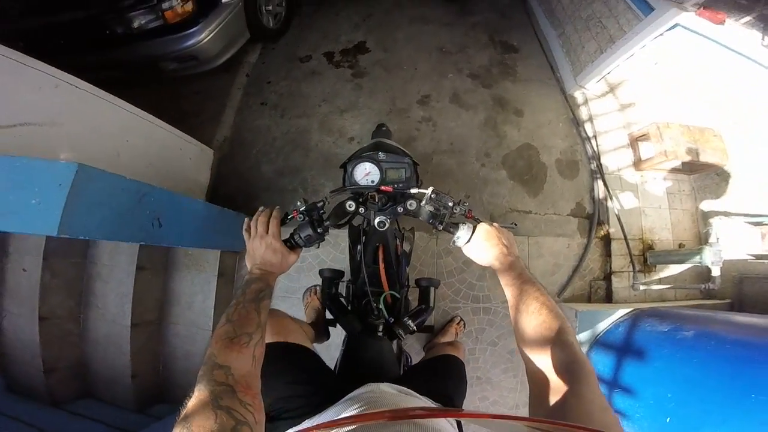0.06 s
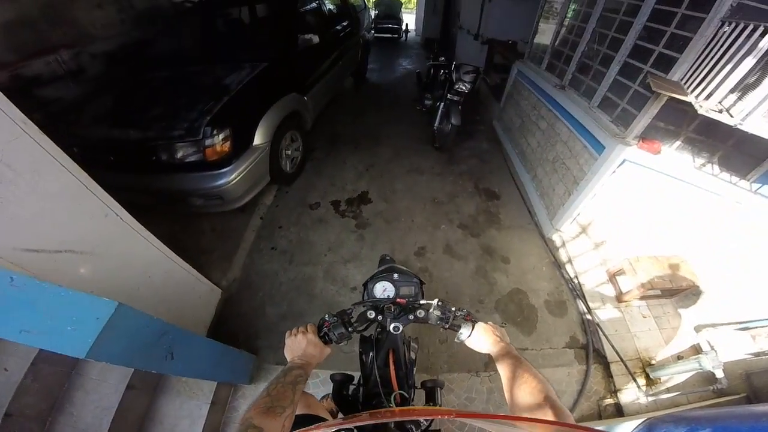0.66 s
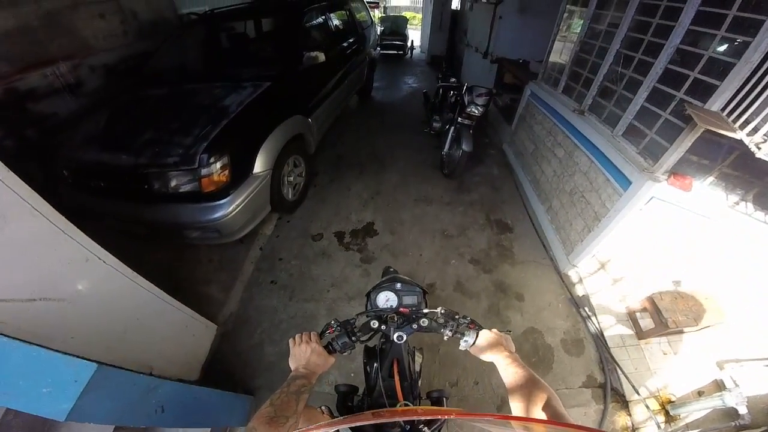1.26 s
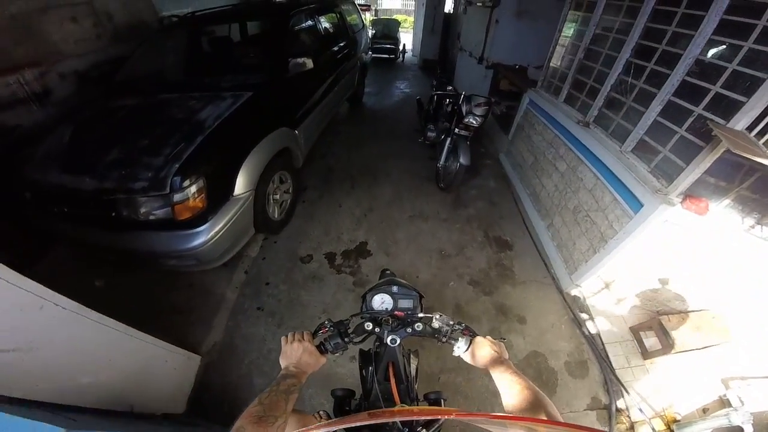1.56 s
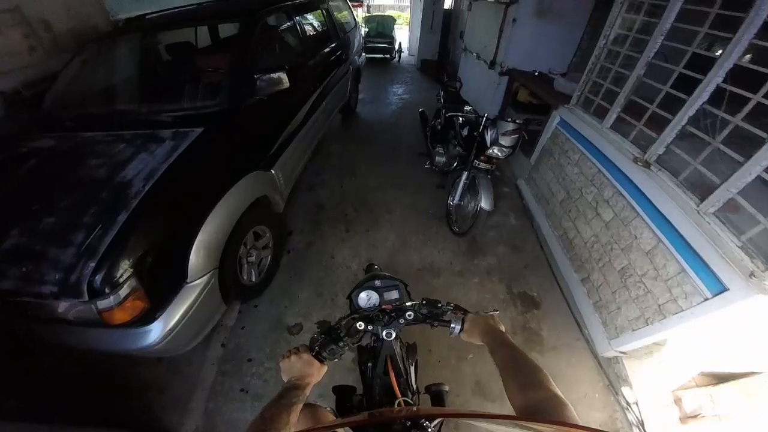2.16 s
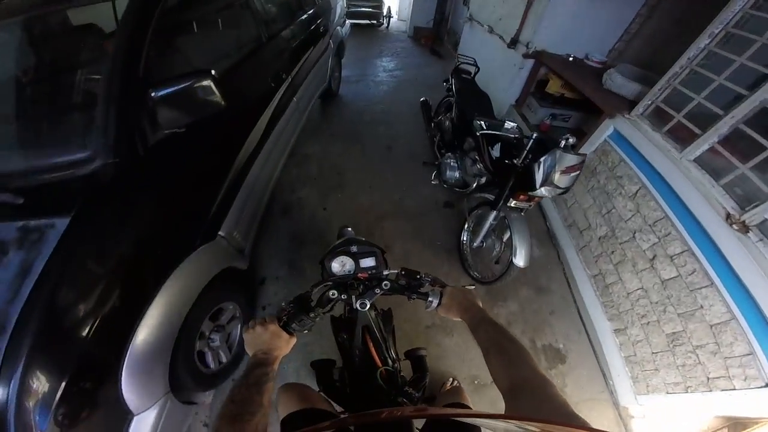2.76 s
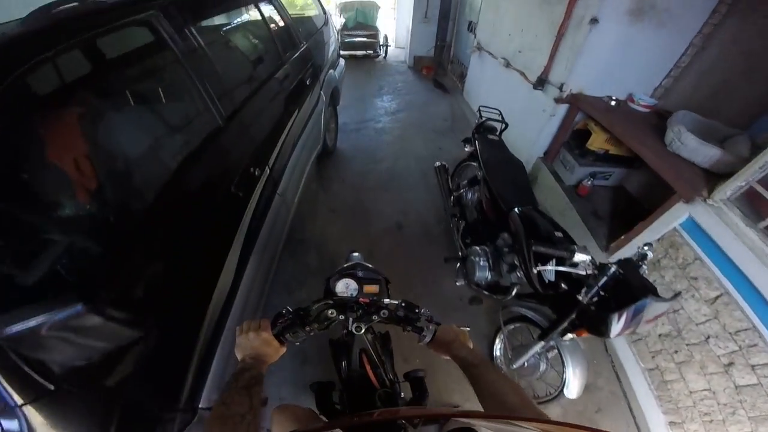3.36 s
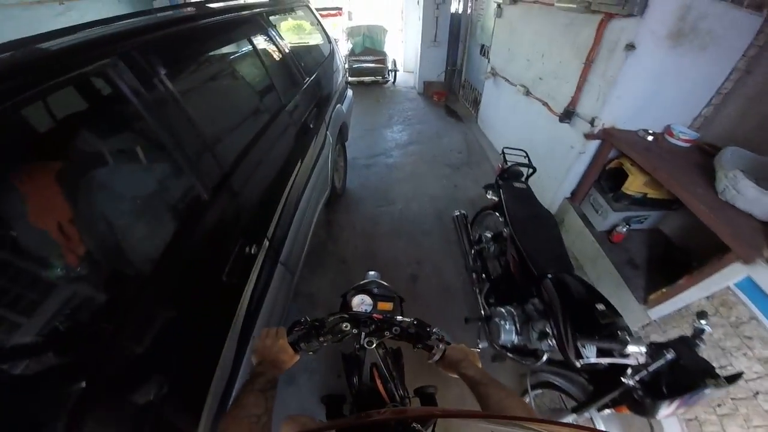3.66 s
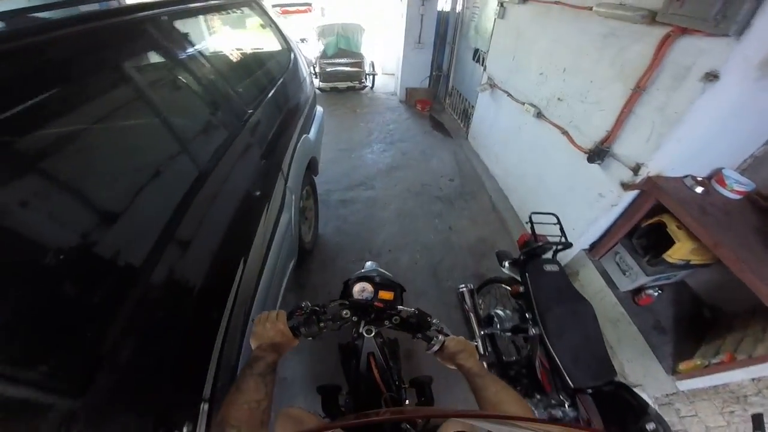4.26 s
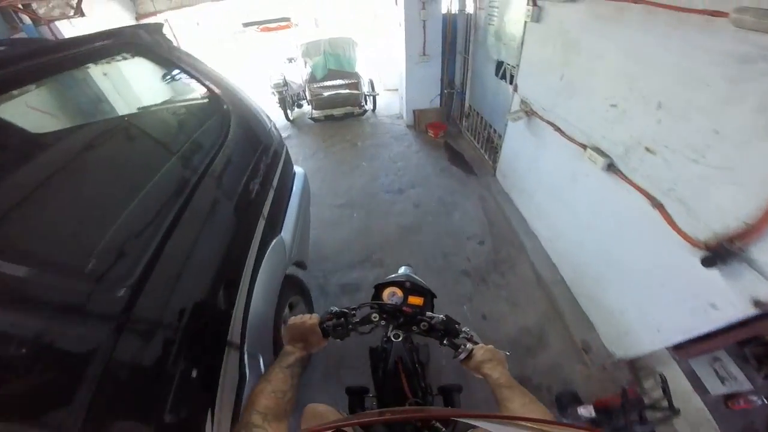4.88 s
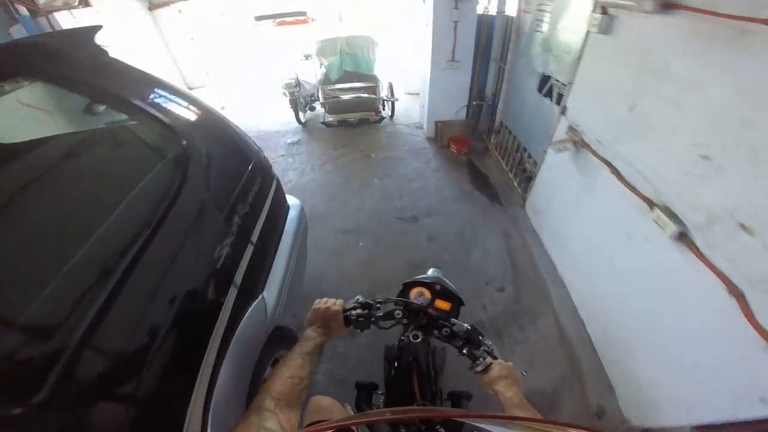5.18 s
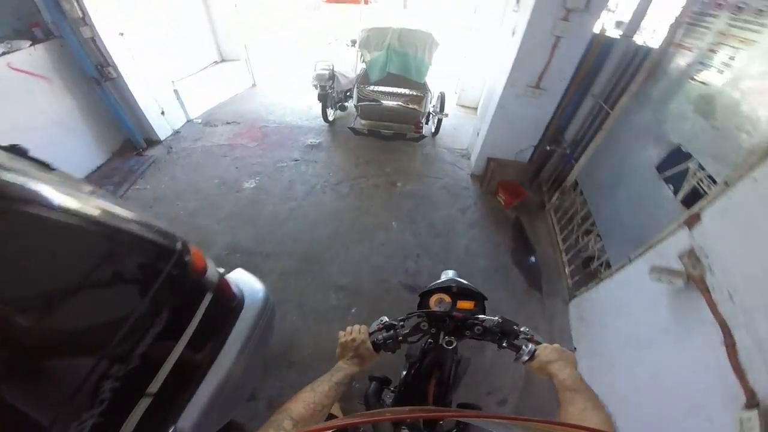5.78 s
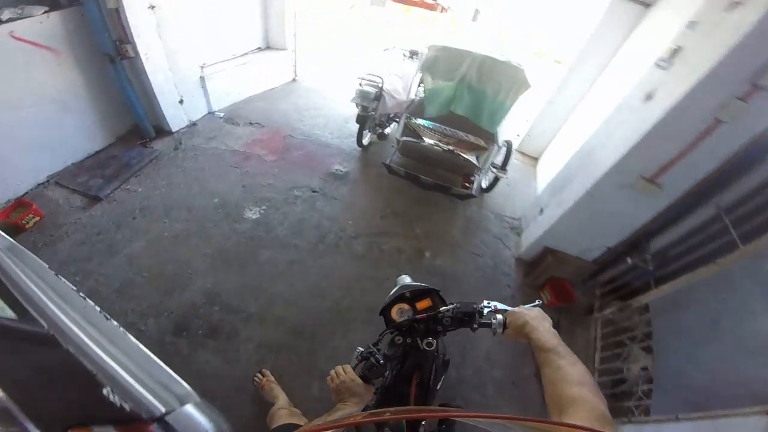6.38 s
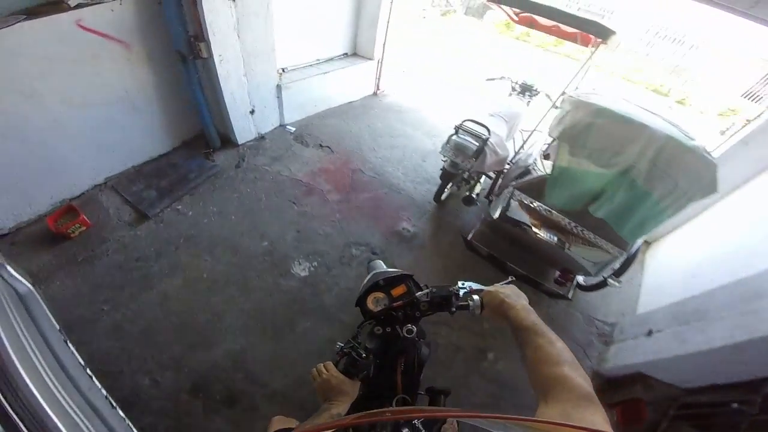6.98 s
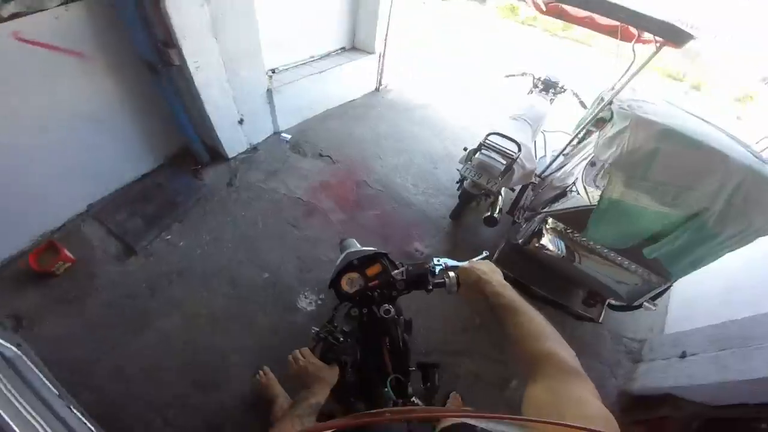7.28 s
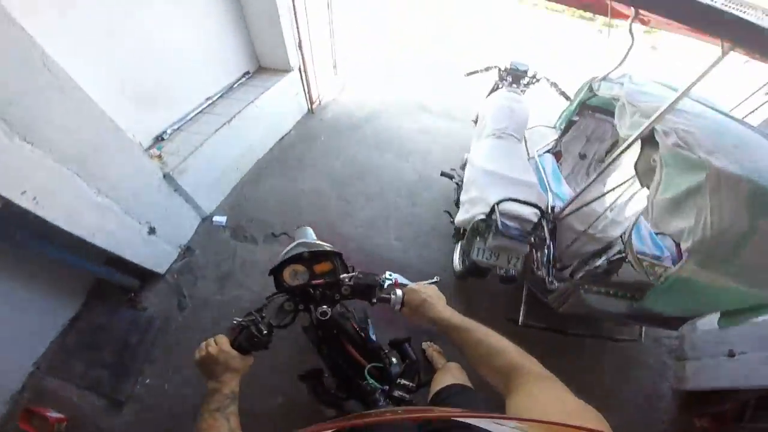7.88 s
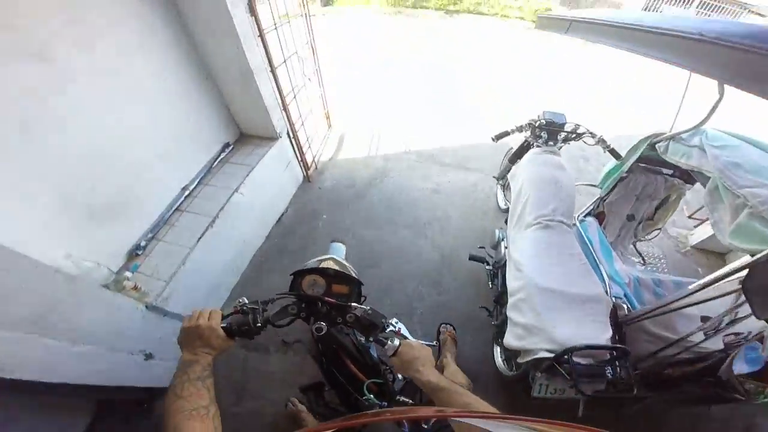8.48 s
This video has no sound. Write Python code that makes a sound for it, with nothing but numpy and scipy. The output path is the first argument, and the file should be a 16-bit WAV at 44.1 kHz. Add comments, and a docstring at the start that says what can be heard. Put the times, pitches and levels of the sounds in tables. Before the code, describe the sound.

A single-cylinder motorcycle creeps through a concrete garage with a low, quick, echoing thump and faint metallic ticking.

```python
"""The low, quick thumping of a motorcycle creeping through a concrete garage, as its rider hears it.
Each firing of the one cylinder thumps out of the muffler and bounces off walls, roof and parked cars.
The garage's own deep notes swell and fade as the bike rolls through them. The engine stumbles twice
under the clutch, sounds duller as it slows and rasps as the throttle opens. Above the thumps, the
valves tick, the cooling fins ring and the chain clinks faintly."""
import sys
import numpy as np
from scipy import signal
from scipy.fft import rfft, irfft, next_fast_len
from scipy.io import wavfile
from scipy.ndimage import uniform_filter1d, minimum_filter1d, map_coordinates

SR = 44100
rng = np.random.default_rng(int(sys.argv[2]) if len(sys.argv) > 2 else 0)


def unload_wav(signal):
    """Save mono or channel-first audio to the path in sys.argv[1] as 16-bit WAV at rate SR, clipped to [-1, 1]."""
    wavfile.write(
        sys.argv[1],
        SR,
        np.round(np.clip(np.atleast_2d(signal).T, -1, 1) * 32767).astype(np.int16),
    )


N = 381024
IDLE_HZ = 19.6  # engine cycles a second; one cycle is two crank turns and one firing

# The rider's hand on the throttle. Each row: time in seconds, opening from 0 to 1.
THROTTLE_OPENING = [(2.9, 0.22), (3.1, .38), (3.85, 0.1), (4.3, 0), (7.3, 0), (7.8, 0.6), (8.15, 0.7),
                    (8.6, 0.4)]
# The bright tone of ticking metal. Each row: frequency in Hz, relative level in dB.
TICK_TONE = [(2200, -29), (3500, -2), (4300, -0.5), (5000, -0.5), (6600, -2), (7400, -5.5), (8300, -4),
             (9000, -10), (10200, -8), (11500, -12.5), (13000, -13), (15000, -19)]


def amp(db):
    """Turn decibels into a gain."""
    return 10 ** (np.asarray(db) / 20)


def unit(x):
    """Scale a signal to an average (rms) level of 1."""
    return x / np.sqrt(np.mean(x ** 2) + 1e-20)


def steady(x, span):
    """Hold the level near 1, evening out changes slower than about span seconds."""
    size = int(span * SR)
    power = uniform_filter1d(uniform_filter1d(x ** 2, size), size)
    return x / np.sqrt(np.abs(power) + 1e-20)


def along(points, hz):
    """Read between (Hz, value) points on a logarithmic frequency scale."""
    f, values = np.transpose(points)
    return np.interp(np.log(hz + 1), np.log(f + 1), values)


def curves(rows, t):
    """Read a table at the times t: one curve for each column after the first."""
    seconds, *columns = np.transpose(rows)
    return [np.interp(t, seconds, column) for column in columns]


def wobble(t, rate):
    """A smooth random curve that passes through rate random values a second."""
    return map_coordinates(rng.standard_normal(int(N / SR * rate) + 4), [t * rate], mode="nearest")


def impulses(times, sizes):
    """One spike at each time."""
    return np.bincount(np.clip(times * SR, 0, N).astype(int), sizes, N + 1)[:N]


def stroke(cycles, centre, width):
    """A smooth bump of height 1 in each engine cycle; the firing comes near 0.75 of the cycle."""
    return np.exp((np.cos(2 * np.pi * (cycles - centre)) - 1) / width)


def filtered(x, response):
    """Multiply each frequency f in x by response(f)."""
    size = next_fast_len(N + SR // 2)
    return irfft(rfft(x, size) * response(np.fft.rfftfreq(size, 1 / SR)), size)[..., :N]


def slope(f, kind, corner_hz, order):
    """A response that lets "low" or "high" frequencies pass; a higher order cuts more steeply."""
    return signal.freqs(*signal.butter(order, 1, kind, analog=True), f / corner_hz)[1]


def resonances(modes, f):
    """The joint response of ringing notes, each given as (Hz, width in Hz, dB)."""
    return sum(amp(db) * 1j * f * width / (hz * hz - f * f + 1j * f * width) for hz, width, db in modes)


def ring(x, hz, width_hz):
    """Let x ring at one note; a narrower width rings longer."""
    return signal.lfilter(*signal.iirpeak(hz, hz / width_hz, fs=SR), x)


def patchy_noise(patchy_db):
    """Hiss with drifting louder and softer patches."""
    spectrum = signal.stft(rng.standard_normal(N), nperseg=512)[2]
    patches = uniform_filter1d(rng.standard_normal(spectrum.shape), size=6, axis=0)
    patches = uniform_filter1d(patches, size=24, axis=1)
    return unit(signal.istft(spectrum * amp(patchy_db * unit(patches)), nperseg=512)[1][:N])


def firings(t, cycles, scatter_db, lead_s, jitter_s):
    """When and how hard the engine fires, once a cycle; no two burns are quite alike."""
    # Cycles that barely fire. Each row: time in seconds, strength in dB against a normal firing.
    misfires = [(.036, -20), (.129, -24), (.226, -24), (2.68, -20), (2.835, -20)]
    times = np.interp(np.arange(-1 / 4, cycles[-1] - 1 / 4), cycles, t) - lead_s
    strength_db = scatter_db * rng.standard_normal(len(times))
    for when, weak_db in misfires:
        strength_db[np.argmin(abs(times - when))] = weak_db
    return times + jitter_s * rng.standard_normal(len(times)), amp(strength_db)


def exhaust(t, speed, times, sizes, bark_db, level_db):
    """Each firing thumps out of the pipe. A labouring engine booms; a faster one sounds thinner."""
    # How hard the engine works. Each row: time in seconds, exhaust level in dB.
    effort = [(0.17, -17), (0.26, -16), (0.28, -16.5), (0.42, -15.5), (0.79, -13), (1.0, -15), (2.43, -16),
              (2.84, -19.5), (3.02, -16.5), (3.22, -13.3), (5.87, -13.5), (7.09, -16.5), (7.36, -14.5),
              (8.33, -14.5), (8.45, -14.5)]
    # The borders between the exhaust's five bands, in Hz.
    borders_hz = [72, 140, 240, 420]
    # The four lower bands, deepest first. Each row: relative level in dB, dB gained per Hz above idle.
    low_bands = [(-21, -1), (-4.5, -0.83), (-1, 0), (-3.5, 0.3)]
    # The deepest bass along the way. Each row: time in seconds, boost in dB.
    bass = [(0.6, -1), (1.7, -1), (2.4, -6), (2.8, 2), (3.3, 0.5), (3.9, -1), (4.7, -1.5), (5.5, 2),
            (6.5, 2.5), (7.8, -3), (8.6, 2)]
    # The top band, the exhaust's bark. Each row: time in seconds, relative level in dB.
    bark = [(0.05, -24.5), (2.53, -28), (3.32, -33), (3.65, -27), (4.68, -32), (5.06, -25.5), (5.31, -26.5),
            (5.59, -24), (7.68, -29.5), (8.26, -21.5), (8.38, -24), (8.45, -25.5)]
    blows = impulses(times, sizes)
    heard = pipe(garage(blows, times, sizes, echo_db=-1.5, tail_db=-2.0, dull_hz=590), t)
    below = lambda f: [0 * f] + [1 / (1 + (f / hz) ** 16) for hz in borders_hz] + [1 + 0 * f]
    bands = filtered(heard, lambda f: np.diff(below(f), axis=0))
    effort_db, bass_db = curves(effort, t)[0], curves(bass, t)[0]
    levels = [db + per_hz * (speed - IDLE_HZ) for db, per_hz in low_bands]
    levels[0] += bass_db
    levels[1] += bass_db / 2
    levels.append(curves(bark, t)[0] - effort_db + bark_db)
    thumps = np.zeros(N)
    for db, band in zip(levels, bands):
        burn_db = np.interp(t, times, rng.standard_normal(len(times)))  # each burn has its own tone
        thumps += amp(db + burn_db) * steady(band, span=0.45)
    thumps += standing_waves(t, pipe(blows, t))
    return amp(effort_db + level_db) * steady(thumps, span=0.18)


def pipe(x, t):
    """The pipe rings and the muffler dulls it; hotter gas carries sound faster and raises the tone."""
    # The pipe's ringing notes. Each row: frequency in Hz, width in Hz, strength in dB.
    pipe_notes = [(324.8, 26, -7.5), (523.5, 27, -3), (613, 52, -4)]
    # Bands the muffler cancels. Each row: frequency in Hz, width in Hz, cancelled part in dB.
    notches = [(234, 21, -6.5), (575, 35, -5.5)]
    # The heat of the gas. Each row: time in seconds, speed of sound as a multiple of that at idle.
    gas_heat = [(0, 1.01), (.8, .965), (1.6, 1.0), (2.4, 1.01), (3.15, .975), (3.8, 1.01), (4.4, .995),
                (5.4, 1.06), (6.7, .995), (7.7, 1.0), (8.1, 1.06), (8.6, 1.035)]

    def tone(f):
        """The pipe's mouth gives out little bass, and the muffler cuts the treble steeply."""
        mouth = slope(f, "high", corner_hz=73, order=3) * slope(f, "high", corner_hz=78, order=1)
        muffler = slope(f, "low", corner_hz=247, order=1) * slope(f, "low", corner_hz=579, order=9)
        return -mouth * muffler * (1 - resonances(notches, f)) * (1 + resonances(pipe_notes, f))

    # Stretch time by the speed of sound, filter, then stretch back: all the notes move together.
    clock = np.cumsum(curves(gas_heat, t)[0] * (1 + .008 * wobble(t, 6)))
    even_clock = np.linspace(clock[0], clock[-1], N)
    soft = filtered(x, lambda f: 1 / (1 + (f / 3000) ** 8))
    rung = filtered(np.interp(even_clock, clock, soft), lambda f: tone(f * N / clock[-1]))
    return np.interp(clock, even_clock, rung)


def garage(blows, times, sizes, echo_db, tail_db, dull_hz):
    """The blows reach the rider directly, as echoes, as a fading wash and as the room's ringing."""
    # The wash is weak in the bass and stronger higher up. Each row: frequency in Hz, gain in dB.
    tail_tone = [(100, -3), (240, -4.5), (420, -3), (620, 0), (760, 1)]
    # Notes that ring all over the garage. Each row: frequency in Hz, width in Hz, gain in dB.
    booms = [(180.1, 4.1, 5.5), (314.6, 49, -0.5), (519, 10.6, -4), (626.6, 19, 2)]
    early = blows + amp(echo_db) * echoes(times, sizes, waver_db=1.0)
    # The rider's body shades the pipe, so higher sounds arrive mostly as wash and ringing.
    early = filtered(early, lambda f: 1 / (1 + (f / dull_hz) ** 8))
    tail = filtered(reverberation(blows), lambda f: amp(along(tail_tone, f)))
    ringing = sum(amp(db) * ring(blows, hz, width) for hz, width, db in booms)
    return early + amp(tail_db) * tail + ringing


def echoes(times, sizes, waver_db):
    """Walls and parked cars throw the blows back while the bike is near them."""
    # Each row: time when nearest in seconds, fade time either side in seconds, delay in ms, gain.
    walls = [(.3, 1.5, 7.44, 0.67), (.2, 1.1, 34.9, .95), (.9, 0.53, 40.6, .42), (1.5, 1.2, 12.06, 0.46),
             (3.35, 0.27, 34.5, 1), (3.4, 0.43, 11.75, 1), (3.4, 0.67, 19.1, 0.49), (4.7, 0.47, 18, 1),
             (4.7, 0.56, 5.1, 0.35), (4.9, 0.49, 7.13, 0.39), (5.2, 0.64, 15.6, 0.3),
             (6.3, 0.59, 10.63, 0.63), (7, 1.3, 8.8, 0.26), (8, 1, 30, 0.48), (8.3, 0.62, 15.6, 0.45),
             (8.6, 0.5, 6.03, 0.24)]
    out = np.zeros(N)
    for nearest, reach, delay_ms, gain in walls:
        nearness = np.exp(-((times - nearest) / reach) ** 2)
        waver = amp(waver_db * wobble(times, 3.9))
        out += impulses(times + delay_ms / 1000, sizes * gain * nearness * waver)
    return out


def reverberation(x, places=14):
    """Countless echoes blur into a fading wash, which changes from one place on the way to the next."""
    # Each row: frequency in Hz, seconds the wash takes to fade by 60 dB.
    fade_times = [(80, 0.4), (300, 0.68), (700, 0.48), (4000, 0.13)]
    out, hop = np.zeros(N + 2 * SR), N // places + 1
    padded = np.pad(x, (hop, 2 * hop))
    for start in range(0, N + hop, hop):
        hz, age, noise = signal.stft(rng.standard_normal(SR // 2), SR, nperseg=256)
        fade = amp(-60 * age / along(fade_times, hz)[:, None])
        rise = 1 - np.exp(-age / 0.01)
        tail = signal.istft(noise * fade * rise, SR, nperseg=256)[1]
        part = padded[start:start + 2 * hop] * np.sin(np.linspace(0, np.pi, 2 * hop))
        wash = signal.fftconvolve(part, tail / np.linalg.norm(tail))
        out[start:start + len(wash)] += wash
    return out[hop:hop + N]


def standing_waves(t, blows):
    """A note of the room swells and fades as the rider passes a spot where its pressure peaks."""
    # Each row: time when nearest in seconds, fade time either side in seconds, frequency in Hz,
    # width in Hz, relative level in dB.
    loud_spots = [(.05, 0.22, 650, 13, -11.5), (.55, 0.5, 94, 15, -3), (.45, 0.79, 140, 26, -2.5),
                  (.7, 0.34, 177, 9.5, -2.5), (1.6, 0.34, 87, 15, -12), (1.7, 0.96, 311.3, 14, -12),
                  (2.3, 0.22, 137.3, 15, -2), (2.88, 0.14, 520, 3.5, -7.5), (3.37, 0.32, 98.4, 7.3, -5.5),
                  (3.35, 0.2, 175.2, 2.7, -2.5), (3.4, 0.35, 314.5, 2.9, -10.5),
                  (4.24, 0.32, 279.5, 2, -1.5), (4.4, 0.24, 176, 4.2, -1.5), (4.58, 0.44, 358, 6, -9),
                  (4.44, 0.79, 530, 9.2, -13), (4.19, 0.36, 607, 6.2, -16.5), (5.52, .45, 660, 23, -16.5),
                  (6.4, .6, 368, 25, -14), (7.82, 0.35, 92.4, 17, -3), (2.23, 0.52, 428, 20, -11),
                  (5.23, 0.72, 117, 8.8, 0), (5.5, 0.52, 185.5, 8.6, 2.5), (6.334, 0.55, 319, 20, -2.5),
                  (7.1, 0.24, 358, 5.8, -5), (6.157, 0.65, 99, 26, -0.5), (7.3, 0.29, 191, 1.3, 5),
                  (7.71, 0.48, 104, 8.1, 0.5), (8.2, 0.26, 132, 25, -2.5), (7.7, 0.34, 320, 19, -0.5),
                  (8.34, 0.22, 324, 15, 2.5), (7.17, 0.79, 645, 50, -18.5), (8.2, 0.21, 670, 51, -8.5),
                  (8.45, 0.41, 191, 4.3, 1.5)]
    out = np.zeros(N)
    for nearest, reach, hz, width, db in loud_spots:
        nearness = np.exp(-((t - nearest) / reach) ** 2)
        out += amp(db) * nearness * steady(ring(blows, hz, width), span=0.19)
    return out


def frame_shake(t, cycles, level_db):
    """The unbalanced piston shakes the frame once per crank turn, twice a cycle."""
    # Each row: time in seconds, relative level in dB.
    shaking = [(0.05, -37), (1.3, -51), (1.36, -39), (4.78, -47), (5.13, -31), (6.71, -44), (8.5, -40)]
    return amp(curves(shaking, t)[0] + level_db) * unit(np.sin(4 * np.pi * cycles))


def engine_rattle(t, speed, cycles, times, sizes, clatter_db, ticking_db, tick_db):
    """Piston and chain noise swell after each firing, more under load; the valves add bright ticks."""
    # Each row: time in seconds, then the relative levels of clatter and of ticking in dB.
    loudness = [(0.1, -44.5, -53), (0.24, -45.5, -57), (0.48, -45, -50.5), (0.92, -44, -51),
                (1.04, -47.5, -53.5), (1.3, -45.5, -51), (2.62, -47, -54), (2.72, -48, -55),
                (2.87, -50.5, -59), (3.02, -47, -55), (3.14, -45.5, -52.5), (3.5, -45, -52),
                (3.78, -43, -49), (4.0, -46, -51.5), (5.56, -47, -53), (6.64, -46.5, -50.5),
                (7.09, -48, -53), (8.55, -44.5, -50)]
    # The clatter's tone. Each row: frequency in Hz, relative level in dB.
    clatter_tone = [(300, -6.5), (700, 4), (900, 2.5), (1200, 0.5), (1700, -1.5), (2200, -4.5),
                    (2550, -6.5), (3200, -5), (3700, -14), (6000, -67)]
    # The ringing of the engine cases and fins. Each row: frequency in Hz, width in Hz, strength in dB.
    case_notes = [(2057, 135, 2), (6550, 320, -23)]
    cases = lambda f: 1 + resonances(case_notes, f)
    # The load rises as the clutch drags the engine below idle and as the throttle opens.
    load = np.clip(0.33 + 0.026 * (IDLE_HZ - speed) + 0.25 * curves(THROTTLE_OPENING, t)[0], 0, 1)
    unevenness = amp(1.8 * rng.standard_normal(len(times)))  # no two cycles rattle equally hard
    force = np.interp(t, times, sizes * unevenness) * load
    clatter = patchy_noise(patchy_db=1.5) * (1 + 1.4 * force * stroke(cycles, centre=0.95, width=0.94))
    clatter = filtered(clatter, lambda f: amp(along(clatter_tone, f)) * cases(f))
    ticks = valve_ticks(t, times, lag_s=.0105, spread_s=.011, fade_s=.008)
    swell = 0.55 * stroke(cycles, centre=1.05, width=1.0) + amp(tick_db) * ticks
    ticking = patchy_noise(patchy_db=1.5) * (1 + force * swell)
    ticking = filtered(ticking, lambda f: amp(along(TICK_TONE, f)) * cases(f))
    clatter_curve, ticking_curve = curves(loudness, t)
    clatter = amp(clatter_curve + clatter_db) * steady(clatter, span=0.2)
    ticking = amp(ticking_curve + ticking_db + 0.44 * wobble(t, 7)) * steady(ticking, span=0.38)
    return clatter + ticking


def valve_ticks(t, times, lag_s, spread_s, fade_s, count=5):
    """The loudness curve of the valves' taps, which bunch up just after each firing and thin out."""
    lags = lag_s + rng.exponential(spread_s, (len(times), count))
    taps = impulses((times[:, None] + lags).ravel(), amp(4 * rng.standard_normal(lags.size)))
    fade = amp(-60 * t[:SR // 20] / fade_s)
    power = signal.fftconvolve(taps ** 2, fade ** 2)[:N]
    return np.sqrt(np.abs(power))


def fin_ring(t, ring_hz, width_hz, flicker_db, level_db):
    """A cooling fin rings unevenly as the engine shakes it, louder after each stumble."""
    # Each row: time in seconds, relative level in dB.
    loudness = [(0, -63.5), (.7, -52.5), (1.4, -61), (2.2, -58), (2.85, -60.5), (3.5, -55), (4.6, -53.5),
                (5.2, -59), (8.6, -59)]
    note = unit(ring(rng.standard_normal(N), ring_hz, width_hz))
    note = unit(ring(note, ring_hz, 2 * width_hz))
    flicker = amp(flicker_db * np.tanh(wobble(t, 24)))
    return amp(curves(loudness, t)[0] + level_db) * unit(note * flicker)


def throttle_rasp(t, cycles, centre_hz, width_hz, level_db):
    """With the throttle open, gas rushes out hoarsely after each firing."""
    hiss = ring(rng.standard_normal(N), centre_hz, width_hz)
    hiss = unit(ring(hiss, centre_hz, width_hz))
    puffs = unit(hiss * stroke(cycles, centre=0.87, width=0.65))
    return amp(level_db) * curves(THROTTLE_OPENING, t)[0] ** 2 * puffs


def chain_clinks(t, rise_s, fade_s, level_db):
    """The drive chain jerks tight and gives short, bright rattles."""
    # Each row: start in seconds, relative level in dB.
    jerks = [(3.0994, -38.5), (3.169, -34), (3.658, -40), (3.712, -38), (3.759, -40), (4.083, -43),
             (4.9357, -39), (6.7483, -39), (7.6635, -41), (7.826, -41), (7.928, -38), (7.9763, -37),
             (8.024, -39), (8.158, -38), (8.257, -37), (8.401, -39)]
    starts, db = np.transpose(jerks)
    age = t[:SR // 10]
    shape = amp(-60 * age / fade_s) * (1 - np.exp(-age / rise_s))
    bursts = signal.fftconvolve(impulses(starts, amp(db + level_db)), shape)[:N]
    tone = lambda f: amp(along(TICK_TONE, f)) * slope(f, "low", corner_hz=8000, order=2)
    return bursts * unit(filtered(rng.standard_normal(N), tone))


def scene():
    """The engine's speed sets the beat, and all the sounds add up in one channel."""
    # Each row: time in seconds, engine cycles a second.
    engine_speed = [(0.0, 22.04), (0.6, 16.52), (0.71, 18.52), (1.02, 19.61), (1.27, 18.85), (1.42, 21.86),
                    (1.65, 20.78), (1.69, 21.27), (2.17, 19.93), (2.27, 22.3), (2.74, 20.01), (2.93, 15.58),
                    (3.2, 13.72), (3.61, 19.04), (3.99, 18.53), (4.51, 18.65), (4.51, 19.34), (4.9, 19.08),
                    (4.96, 20.68), (5.78, 20.6), (5.9, 19.62), (6.48, 18.17), (6.95, 20.63), (7.22, 19.45),
                    (7.65, 18.78), (7.82, 18.91), (7.99, 21.81), (8.64, 19.77)]
    t = np.arange(N) / SR
    speed = curves(engine_speed, t)[0]
    cycles = np.cumsum(speed) / SR
    times, sizes = firings(t, cycles, scatter_db=1.0, lead_s=0.004, jitter_s=0.0003)
    mix = exhaust(t, speed, times, sizes, bark_db=4.0, level_db=0.12)
    mix += frame_shake(t, cycles, level_db=-2.0)
    mix += throttle_rasp(t, cycles, centre_hz=776, width_hz=130, level_db=-44.5)
    mix += engine_rattle(t, speed, cycles, times, sizes, clatter_db=2.0, ticking_db=0.5, tick_db=7.5)
    mix += fin_ring(t, ring_hz=4330, width_hz=330, flicker_db=5, level_db=0)
    mix += fin_ring(t, ring_hz=6550, width_hz=500, flicker_db=7, level_db=-4)
    mix += chain_clinks(t, rise_s=0.0018, fade_s=0.051, level_db=-3.5)
    return mix[None]


def record(dry):
    """Ease the volume down around the highest peaks and cut off the very top of the treble."""
    ceiling_db, lookahead_s, top_hz = -1, 0.015, 15200
    size = int(lookahead_s * SR)
    needed = np.minimum(1, amp(ceiling_db) / (np.abs(dry) + 1e-9))
    held = minimum_filter1d(needed, 2 * size)
    gain = uniform_filter1d(uniform_filter1d(held, size), size)
    return filtered(dry * gain, lambda hz: hz < top_hz)


dry = scene()
out = record(dry)
unload_wav(out)
```